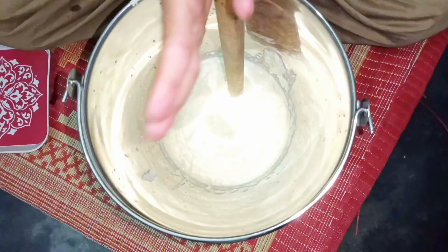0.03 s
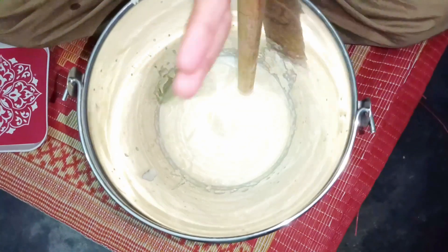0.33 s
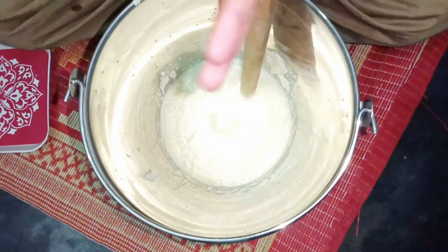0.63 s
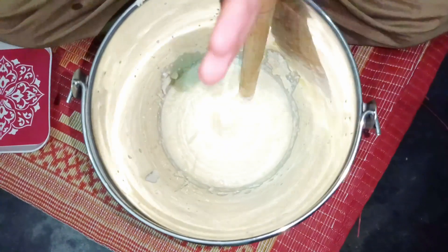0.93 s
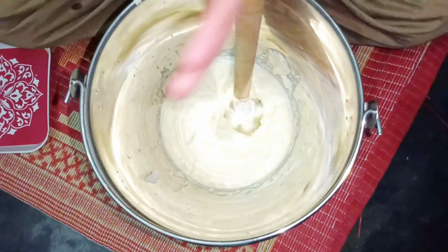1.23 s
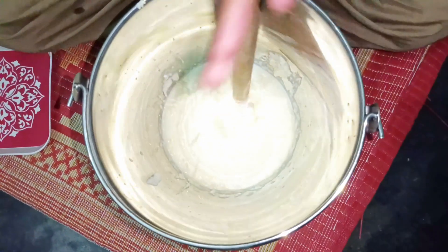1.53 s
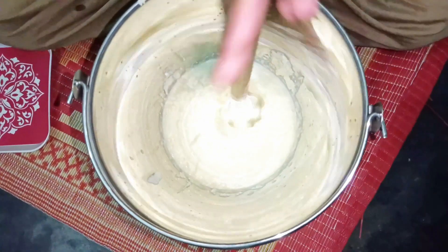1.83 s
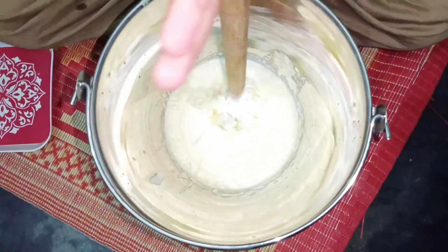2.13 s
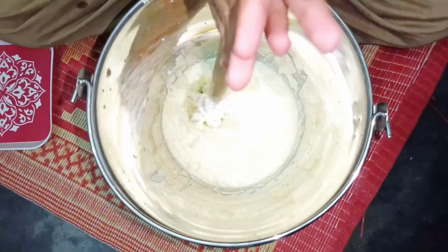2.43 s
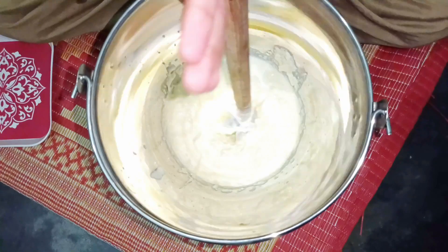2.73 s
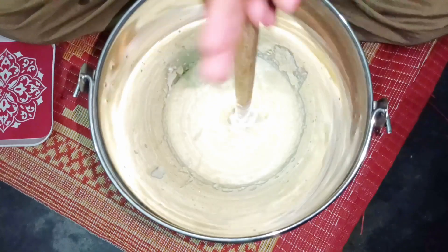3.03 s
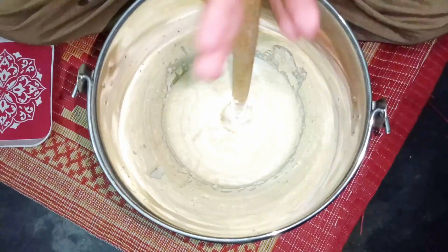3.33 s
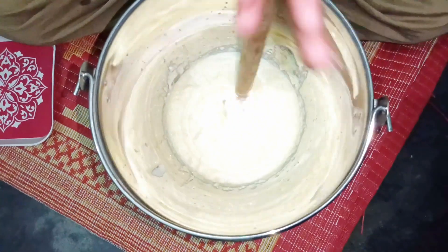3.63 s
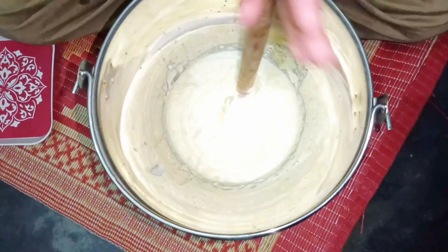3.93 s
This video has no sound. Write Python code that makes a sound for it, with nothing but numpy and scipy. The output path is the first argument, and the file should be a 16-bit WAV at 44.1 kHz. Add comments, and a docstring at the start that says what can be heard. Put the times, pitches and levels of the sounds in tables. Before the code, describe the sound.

Cream is churned with a wooden stick in a metal pot, in a small, faintly hissing room. After a soft rub, the stick knocks at 0.6 and 0.9 seconds, ringing the metal and rattling briefly. From 1.3 to 2.4 seconds the cream glugs hollowly, splashes and pops. A pause with stray drips follows, then churning returns from 3.4 to 4 seconds. The rocking pot rumbles faintly underneath.

```python
"""A wooden stick is spun between the palms in a metal pot of cream, in a small, faintly hissing room.
It rubs softly on the pot, knocks twice so that the metal rings, and rattles. Then it churns for about
a second: air pockets glug in the hollow pot, the cream gurgles and splashes, and bubbles pop.
A pause with a few stray drips follows, then a second bout of churning.
All along, the pot rumbles as it rocks on its mat, more when the stick works harder."""
import sys
import numpy as np
from scipy import signal
from scipy.fft import rfft, irfft
from scipy.io import wavfile
from scipy.ndimage import uniform_filter1d, map_coordinates

SR = 44100
rng = np.random.default_rng(int(sys.argv[2]) if len(sys.argv) > 2 else 0)


def to_wav(sig):
    """Store sig (one row per channel, or 1-D mono) as 16-bit WAV at the path in sys.argv[1].

    Samples outside -1..1 are clipped; the rate is SR.
    """
    pcm = np.clip(np.atleast_2d(sig), -1, 1) * 32767
    pcm = np.round(pcm).astype(np.int16)
    wavfile.write(sys.argv[1], SR, pcm.T)  # frames by channels


N = 176400
T = np.arange(N) / SR
DROPLETS_PER_S = 1400


def undb(db):
    """Turn decibels into a number to multiply by."""
    return 10 ** (np.asarray(db) / 20)


def unit(x):
    """Scale a signal to an average strength (rms) of 1."""
    return x / np.sqrt(np.mean(x ** 2))


def colour(x, points):
    """Make some pitches louder and others softer, following (Hz, dB) points."""
    hz, db = np.array(points).T
    freqs = np.maximum(np.fft.rfftfreq(len(x), 1 / SR), 1)
    gain = undb(np.interp(np.log(freqs), np.log(hz), db))
    return irfft(rfft(x) * gain, len(x))


def band(x, hz, width):
    """Keep mainly the sound near one pitch."""
    return signal.lfilter(*signal.iirpeak(hz, hz / width, fs=SR), x)


def steep(x, hz, width):
    """Keep a band with sharper edges, at strength 1."""
    return unit(band(band(x, hz, width), hz, width))


def envelope(attack, hold, release):
    """A loudness shape half a second long: rise, hold, fade (all in seconds)."""
    t = T[:SR // 2]
    rise = np.sin(np.pi / 2 * np.minimum(t / attack, 1)) ** 2
    return rise * np.exp(-np.maximum(t - attack - hold, 0) / release)


def add(out, start, x):
    """Mix x into out at a start time in seconds."""
    i = int(start * SR)
    out[i:i + len(x)] += x[:N - i]


def grains(per_s, size):
    """Random clicks of uneven strength."""
    chance, strength, sign = rng.random(size), rng.exponential(size=size), rng.choice([-1, 1], size)
    return (chance < per_s / SR) * sign * undb(1.5 * np.minimum(strength, 4))


def walk(size, per_s):
    """A smooth random curve that changes about per_s times a second."""
    span = int(SR / per_s)
    return unit(uniform_filter1d(uniform_filter1d(rng.standard_normal(size), span), span // 2))


def blip(hz, env, glide_per_s, wobble):
    """A short tone whose pitch can slide and wobble, like a bubble changing shape."""
    drift = unit(uniform_filter1d(rng.standard_normal(len(env)), SR // 200))
    pitch = hz * np.exp(glide_per_s * T[:len(env)] + wobble * drift)
    return env * np.sin(2 * np.pi * np.cumsum(pitch) / SR)


def background():
    """A faint, steady noise, strongest in the bass."""
    # tone of the noise (frequency [Hz], level [dB])
    noise_tone = [(60, 4.5), (200, -20), (1000, -22.5), (12000, -31.5)]
    return undb(-71) * unit(colour(rng.standard_normal(N), noise_tone))


def rub():
    """Wood catches and slips on the metal with a faint note."""
    out, env = np.zeros(N), envelope(attack=0.05, hold=0.1, release=0.05)
    note = steep(rng.standard_normal(len(env)), hz=1043, width=130)
    add(out, start=0.2, x=undb(-67) * env * note)
    return out


def knocks():
    """The stick hits the pot: ringing notes, a noisy clang and a thud."""
    # hits of the stick (time [s], level [dB], extra clang [dB])
    hits = [(0.608, -2.5, 3.5), (0.9419, 1.5, 2.5)]
    # notes the pot rings at (pitch [Hz], level [dB])
    pot_notes = [(91, -13), (205, -7), (312, -1), (436, 1), (494, -3.5), (567, -16), (712, -6.5),
                 (883, -12), (942, -8), (988, -3.5), (1548, -3.5), (1629, -17.5)]
    # tone of the clang (frequency [Hz], level [dB])
    clang_tone = [(110, -26.5), (220, -8), (443, 2), (645, -9), (950, -2.5), (1260, -21), (1570, -7.5),
                  (2650, -33.5), (6000, -45), (9000, -73)]
    ring_s, clang_s = 0.41, 0.43  # time to fade by 60 dB; the ring's is for 500 Hz
    out, t = np.zeros(N), T[:SR]
    onset = np.minimum(t / 0.0027, 1)
    for start, db, clang_db in hits:
        ring = 0
        for k, (hz, note_db) in enumerate(pot_notes):
            fade_db = 60 * t / ring_s * (hz / 500) ** 0.12  # low notes ring longer
            ring += (-1) ** k * undb(note_db - fade_db) * np.sin(2 * np.pi * hz * t)
        clang = unit(colour(rng.standard_normal(SR), clang_tone))
        clang *= undb(clang_db - 23.5 - 60 * t / clang_s)
        add(out, start, undb(db) * (undb(-26) * ring + clang) * onset)
        thud = blip(hz=445, env=envelope(0.0026, 0.0084, 0.0016), glide_per_s=0, wobble=0)
        add(out, start, undb(db - 12.5) * thud)
    return out


def rumble(sound):
    """The pot rocks on its mat; the louder the given sound, the stronger the rumble."""
    force = np.abs(uniform_filter1d(np.abs(sound), SR // 20)) + 1e-9
    return undb(-38.5) * force ** 0.6 * steep(rng.standard_normal(N), hz=42.3, width=55)


def rattles():
    """The stick chatters on the pot after a knock, and the cream on it sizzles."""
    # ticks of the stick (time [s], level [dB])
    ticks = [(0.955, -34.5), (0.969, -21.5)]
    # tone of a tick (frequency [Hz], level [dB])
    tick_tone = [(300, -23), (1700, 5.5), (2500, -3.5), (5700, -10.5), (7000, -12.5), (10000, -53.5)]
    out = np.zeros(N)
    snap, tail = envelope(0.00093, 0, 0.0052), envelope(0.0052, 0, 0.036)
    for start, db in ticks:
        sizzle = tail * steep(grains(DROPLETS_PER_S, len(tail)), hz=5560, width=1390)
        tick = snap * unit(colour(rng.standard_normal(len(snap)), tick_tone))
        add(out, start, undb(db) * (tick + undb(-25.5) * sizzle))
    return out


def glugs():
    """Large air pockets ring briefly, and the cream gulps as it falls back in."""
    # air pockets closing behind the stick (time [s], pitch [Hz], level [dB], hold [s])
    pockets = [(1.217, 399.7, -38, 0.027), (1.351, 338, -32.5, 0.0064), (1.4161, 395.7, -14, .012),
               (1.44, 315, -26.5, 0.028), (1.556, 350.4, -20, 0.017), (1.597, 355, -30, 0.035),
               (1.6996, 391, -19, 0.0067), (1.719, 375, -21.5, 0.0046), (1.762, 370, -26.5, 0.0091),
               (1.785, 390, -25.5, 0.015), (1.876, 270, -29.5, 0.0054), (2.029, 336, -28.5, 0.0064),
               (2.159, 313, -33.5, 0.02), (3.142, 416, -59, 0.011), (3.289, 366, -47.5, 0.041),
               (3.434, 324, -30.5, 0.019), (3.564, 406, -24.5, 0.019), (3.629, 394, -31.5, 0.0056),
               (3.6997, 395, -19.5, 0.015), (3.799, 367, -28.5, 0.0094), (3.862, 391, -24, 0.018),
               (3.919, 392, -29.5, 0.017)]
    out = np.zeros(N)
    for start, hz, db, hold in pockets:
        tone = blip(hz, envelope(0.004, hold, 0.0045), glide_per_s=-0.37, wobble=0.021)
        gulp = steep(rng.standard_normal(len(tone)), hz=307.8, width=240) * envelope(0.004, hold, 0.022)
        add(out, start, undb(db) * (tone + undb(-11.5) * gulp))
    return out


def squelch(x):
    """Folds of cream open and close: the sound swells, dips and bends in pitch."""
    swell, bend = walk(len(x), per_s=35), walk(len(x), per_s=35)
    speed = np.exp(0.09 * np.tanh(bend))
    bent = map_coordinates(x, [np.cumsum(speed)], mode="mirror")  # play x faster and slower
    return unit(bent * undb(4 * np.tanh(2 * swell)))


def swirl():
    """Thick cream gurgles around the turning stick."""
    # loudness of the swirling (time [s], level [dB])
    loudness = [(0, -65), (.5, -88.5), (1.26, -56), (1.36, -37), (1.78, -38.5), (1.85, -44.5), (2.17, -44),
                (2.26, -69.5), (3.38, -83), (3.46, -41.5), (3.88, -38.5), (4.0, -50)]
    # tone of the cream (frequency [Hz], level [dB])
    cream_tone = [(60, -19), (160, -26), (215, 0), (390, 12), (540, -7.5), (960, -6.5), (1200, -7),
                  (4000, -49.5)]
    gurgle = squelch(colour(grains(per_s=700, size=N), cream_tone))
    return undb(np.interp(T, *np.array(loudness).T)) * gurgle


def flicker(x):
    """High bands of sound swell and fade on their own as films of cream open and close."""
    out = 0
    for hz in np.geomspace(1500, 13000, num=14):
        gain = undb(7.5 * np.tanh(walk(len(x), per_s=41)))
        out += gain * band(band(x, hz, hz / 5), hz, hz / 5)
    return out


def splashes():
    """Each splash is a froth of tiny bubbles under a crackle of spray."""
    # splashes of cream (time [s], hold [s], froth level [dB], froth pitch [Hz], spray level [dB])
    splats = [(1.297, 0.051, -45.5, 1710, -45), (1.337, 0.089, -41, 1790, -48),
              (1.445, 0.0061, -53, 2120, -36), (1.473, .18, -49, 1840, -58), (1.745, 0.051, -51, 2330, -58),
              (1.856, 0.023, -34, 1344, -54.5), (1.908, 0.024, -46.5, 1430, -50.5),
              (1.988, 0.037, -44.5, 1850, -56.5), (2.06, 0.015, -48.5, 1910, -51),
              (2.152, 0.027, -44.5, 1400, -47), (2.33, 0.031, -48.5, 2065, -54),
              (2.353, 0.039, -45, 2120, -51), (2.485, 0.044, -56.5, 2212, -61), (3, 0.06, -70, 2170, -85),
              (3.336, 0.044, -60.5, 1900, -75.5), (3.428, 0.067, -48, 1920, -53.5),
              (3.459, 0.04, -43, 2370, -51.5), (3.558, 0.11, -47, 1880, -53.5),
              (3.707, 0.024, -43.5, 1710, -49.5), (3.751, 0.043, -54.5, 1885, -57),
              (3.852, 0.1, -45.5, 1220, -66)]
    # tone of the spray (frequency [Hz], level [dB])
    spray_tone = [(1500, -5), (3000, -3.5), (7000, -13.5), (7800, -22.5), (8900, -21), (10000, -39)]
    # fine fizz thrown by the hardest splashes (time [s], level [dB])
    fizzes = [(1.424, -66), (3.459, -65.5)]
    out, fade_s = np.zeros(N), 0.026
    for start, hold, db, hz, spray_db in splats:
        env = envelope(0.13 * hold, hold, fade_s)
        bubbles = steep(grains(per_s=1500, size=len(env)), hz, width=0.37 * hz)
        froth = squelch(band(bubbles, hz, width=hz))
        droplets = flicker(grains(DROPLETS_PER_S, len(env)))
        spray = unit(colour(droplets, spray_tone))
        add(out, start, env * (undb(db) * froth + undb(spray_db) * spray))
    for start, db in fizzes:
        env = envelope(0.0052, 0.028, fade_s)
        fizz = steep(grains(DROPLETS_PER_S, len(env)), hz=12480, width=6240)
        add(out, start, undb(db) * env * fizz)
    return out


def pops():
    """Small bubbles burst with a short raspy blip."""
    # bursting bubbles (time [s], pitch [Hz], level [dB])
    bursts = [(1.299, 1867, -30), (1.339, 2075, -17.5), (1.447, 2170, -28.5), (1.681, 906, -37),
              (1.719, 898, -32.5), (2.36, 2020, -27.5), (2.473, 2248, -32), (2.536, 2080, -41.5),
              (2.994, 2093, -48), (3.571, 1970, -27.5), (3.762, 1967, -31), (3.847, 1138, -30)]
    out = np.zeros(N)
    for start, hz, db in bursts:
        hold = 0.012 * (1000 / hz) ** 4.4  # smaller, higher bubbles are briefer
        env = envelope(0.0075, hold, 0.00078)
        rasp = 0.14 * env * steep(rng.standard_normal(len(env)), hz, width=hz / 2)
        tone = blip(hz, env, glide_per_s=0.5, wobble=0.029)
        add(out, start, undb(db) * (tone + rasp))
    return out


def hollow(x):
    """The air in the pot rings along at a few pitches of its own."""
    # notes of the air in the pot (pitch [Hz], gain [dB])
    air_notes = [(232, 3), (311, -10), (388, -10), (640, 1), (950, 6)]
    return sum(undb(db) * band(x, hz, width=hz / 23) for hz, db in air_notes)


def room(x):
    """The blurred echoes of a small room; the highs die sooner."""
    # tone of the echoes (frequency [Hz], level against the direct sound [dB])
    echo_tone = [(300, -11.5), (450, -9.5), (1000, -7.5), (6000, -6.5)]
    low_s, high_s, split_hz = 0.35, 0.32, 4000  # times to fade by 60 dB, below and above the split
    t = T[:SR]
    noise = colour(rng.standard_normal(SR), echo_tone)
    low = signal.sosfilt(signal.butter(2, split_hz, fs=SR, output="sos"), noise)
    high = signal.sosfilt(signal.butter(2, split_hz, "high", fs=SR, output="sos"), noise)
    build = np.minimum(t / 0.012, 1)
    low_env, high_env = build * undb(-60 * t / low_s), build * undb(-60 * t / high_s)
    echoes = (low * low_env - high * high_env) / np.linalg.norm(low_env)
    return signal.fftconvolve(x, echoes)[:N]


def scene():
    """Mix stick, pot and cream; only the cream and the rattles echo in the room."""
    cream = glugs() + pops() + splashes() + swirl()
    chatter = rattles()
    pot = knocks() + chatter + rub() + cream + hollow(cream)
    return (pot + background() + room(cream + chatter) + rumble(pot))[None]


def record(dry):
    """Cut away the very highest sounds."""
    top_hz = 15750
    return signal.sosfilt(signal.ellip(10, .2, 80, top_hz, fs=SR, output="sos"), dry)


dry = scene()
out = record(dry)
to_wav(out)
```